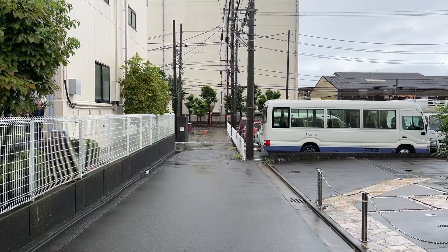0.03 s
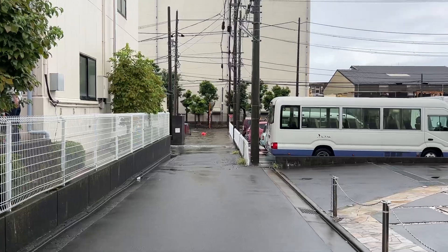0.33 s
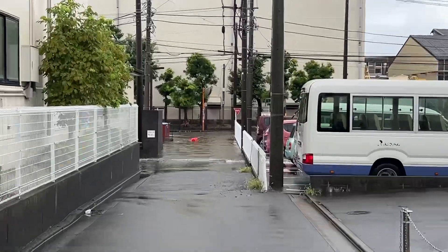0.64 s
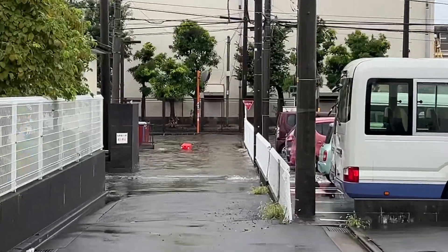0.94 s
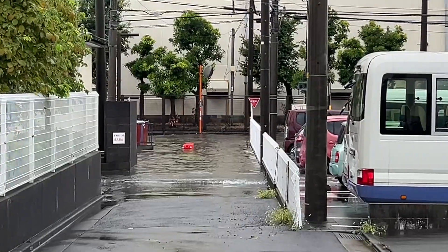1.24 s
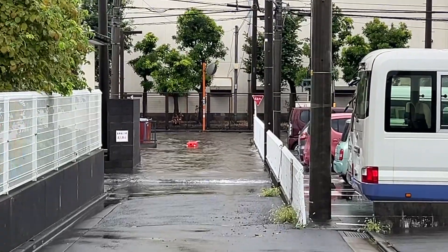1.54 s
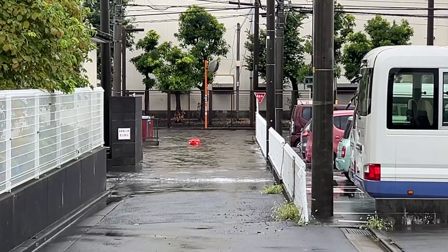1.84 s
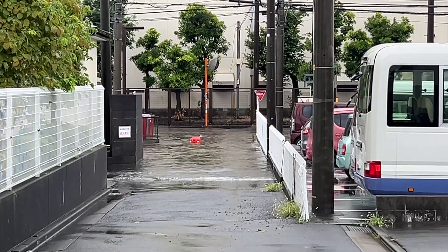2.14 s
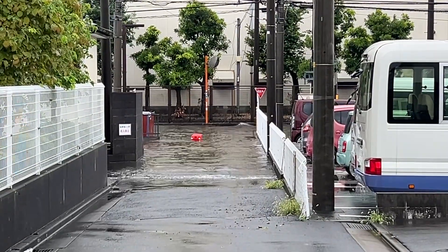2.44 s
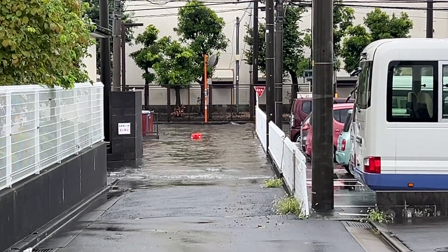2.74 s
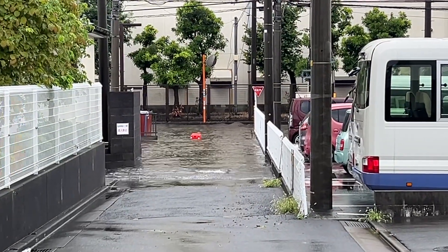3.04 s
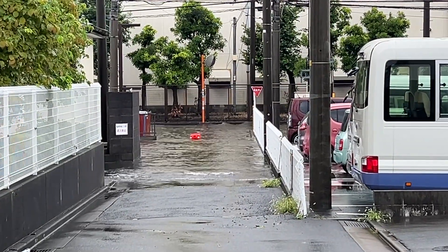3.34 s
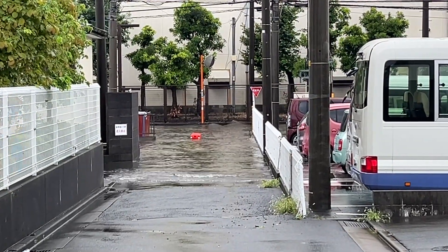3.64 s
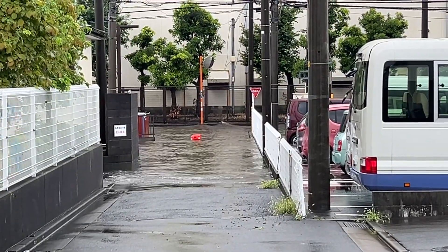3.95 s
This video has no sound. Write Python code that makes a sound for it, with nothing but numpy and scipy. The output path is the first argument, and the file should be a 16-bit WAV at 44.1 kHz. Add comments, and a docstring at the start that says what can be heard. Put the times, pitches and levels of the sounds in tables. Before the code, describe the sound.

Shallow water laps and trickles over a flooded lane, with hiss, tiny bubbles, stray drips and small splashes. A thin motor whine holds throughout above a distant town rumble. Early on, the stereo hiss narrows and the whine comes forward.

```python
"""A flooded lane between buildings, just after heavy rain, on a stereo microphone. Shallow water laps
and trickles over the asphalt with hiss, ringing bubbles, spray, stray drips and small splashes.
A motor, perhaps a pump, whines steadily; farther off the town rumbles and air and water rush between
the walls. Early on the microphone zooms in: the water's hiss narrows and the whine comes forward."""
import sys
import numpy as np
from scipy import signal
from scipy.fft import rfft, irfft
from scipy.io import wavfile

SR = 44100
rng = np.random.default_rng(int(sys.argv[2]) if len(sys.argv) > 2 else 0)


def log_audio(samples):
    """Write samples as a 16-bit WAV file to the path given in sys.argv[1]."""
    # one column per channel
    frames = np.atleast_2d(samples).T
    # limit to full scale, then quantise
    limited = np.clip(frames, -1, 1)
    pcm = np.round(limited * 32767).astype(np.int16)
    wavfile.write(sys.argv[1], SR, pcm)


N = 176400
TIME = np.arange(N) / SR
FREQS = np.maximum(np.fft.rfftfreq(N, 1 / SR), 1)

# hiss of the running water (frequency [Hz], density [dB/Hz])
HISS_SPECTRUM = [(900, -104), (2200, -92), (3200, -94.5), (4300, -93), (5100, -96), (6000, -98.3),
                 (8200, -100.3), (10500, -106), (13000, -109.5), (15500, -110)]
# rise and fall of the lapping (time [s], gain [dB])
LAPPING_SWELL = [(0, -1), (.4, -2), (.52, -0.5), (.74, -0.7), (.85, -1.8), (1.15, -0.7), (1.4, -0.5),
                 (1.72, 0), (2.2, -1.5), (2.54, -0.7), (2.7, -0.5), (3.1, -1), (3.4, -1.5), (4, -2)]
# colour of fine droplets (frequency [Hz], relative level [dB])
SPRAY_SPECTRUM = [(1000, -25), (2500, -12), (4800, 3), (6200, -4.5), (7800, 1), (10000, -0.5), (13000, -6),
                  (15500, -5)]
# small splashes (time [s], level [dB], t60 [s], ping pitch [Hz], ping over slap [dB])
SPLASH_EVENTS = [(0.353, -60, .05, 7500, -1), (0.387, -60, .04, 7000, 2), (1.233, -64, .06, 7000, -10),
                 (1.653, -54.5, .1, 6800, 1), (2.44, -63, .03, 7300, 2), (2.996, -61, .06, 7000, -10),
                 (3.5023, -52.5, .055, 8100, 1)]
# wavelets breaking on the asphalt (time [s], length [s], level [dB])
WAVELET_EVENTS = [(0.7, 0.07, -65), (1.27, .12, -66), (1.68, 0.08, -59), (2.44, 0.21, -60.5)]
# single drips (time [s], pitch [Hz], level [dB], t60 [s])
DRIP_EVENTS = [(.499, 4750, -52.5, 0.14), (.715, 4600, -56, .15), (.96, 13000, -63, .035),
               (1.32, 4900, -57, .15), (1.654, 3960, -53.5, 0.1), (1.871, 13200, -58.5, .018),
               (2.015, 2900, -51, 0.013), (2.248, 12600, -59, .015), (2.283, 4330, -52.5, 0.057),
               (2.635, 2600, -45, 0.03), (3.186, 2500, -48, .03), (3.826, 2600, -49, 0.035)]
# the motor's whine at the microphone (time [s], left level [dB], right level [dB])
WHINE_LEVELS = [(0, -52, -54), (.25, -50, -69), (.34, -49, -52), (.41, -53, -55), (.46, -48, -45),
                (.72, -51, -46.5), (1.1, -50.5, -46.5), (1.38, -51, -47), (1.5, -47, -44), (1.62, -54, -50),
                (1.69, -50, -46), (2.25, -48.5, -45), (2.6, -51, -46.5), (3.2, -49.5, -46),
                (3.38, -51, -47.8), (3.55, -50, -46), (4, -49.5, -45.5)]
# the motor's weaker tones (pitch [Hz], level [dB])
HUM_TONES = [(399.5, -56), (548, -68), (1210, -72), (1459, -68), (2285, -74), (2675, -71), (7720, -85.5),
             (11612, -83), (11817, -91.5), (12026, -90), (15130, -92)]
# distant traffic and machinery (frequency [Hz], density [dB/Hz])
RUMBLE_SPECTRUM = [(18, -92), (30, -81), (42, -66.5), (57, -59.5), (80, -62), (100, -65.5), (122, -61),
                   (200, -71.5), (400, -86), (1000, -105), (3000, -150)]
# swell of the rumble (time [s], gain [dB])
RUMBLE_GAIN = [(0, -2.5), (.3, -1.5), (.6, -1.5), (.8, 1), (1.2, -1), (1.5, -1), (1.7, 0.5), (2.1, -0.6),
               (2.25, 0.5), (2.4, -2.5), (2.6, -2.5), (3.1, 0.5), (3.4, -3), (3.58, -2), (4, -0.5)]
# low throbs in the rumble (time [s], length [s], pitch [Hz], level [dB])
THROB_EVENTS = [(0.018, 0.073, 66, -44), (0.108, 0.077, 72, -43), (1.24, .09, 68, -43.5),
                (1.538, .13, 119, -43.5), (1.58, 0.21, 56.7, -45.5), (1.84, 0.13, 58, -42.5),
                (2.31, 0.14, 58.3, -44.5), (3.259, 0.11, 66.4, -42), (3.43, 0.085, 112, -41.5),
                (3.717, 0.11, 62, -44.5)]
# far rush of air and water between the walls (frequency [Hz], density [dB/Hz])
RUSH_SPECTRUM = [(100, -80.5), (280, -71.5), (450, -75.5), (720, -77), (1030, -81), (1500, -78.5),
                 (1850, -81), (2300, -90.5), (3000, -95.5), (6000, -112), (15000, -135)]
# swell of the rush (time [s], gain [dB])
RUSH_GAIN = [(0, 0.8), (.45, 1.06), (.95, -0.2), (1.3, 0.3), (1.7, 0.8), (2.0, 0), (2.5, 0.9), (2.95, 0),
             (3.1, 0.8), (3.4, 0.5), (3.65, -1.1), (4, -0.5)]
# lean of the far sounds (frequency [Hz], left minus right [dB])
FAR_BALANCE = [(60, 0.5), (130, 0), (280, 1.5), (520, 1.4), (750, 1), (1050, -1.0), (1450, -3), (1900, -2),
               (3000, -0.5)]
# likeness of left and right in diffuse noise (frequency [Hz], correlation [-1 to 1])
STEREO_LIKENESS = [(50, 0.97), (160, 0.89), (280, 0.86), (480, 0.33), (720, 0.4), (900, 0.15),
                   (1250, -0.011), (1520, -0.46), (1850, 0.62), (2500, 0.88), (3600, 1), (4600, 1),
                   (5600, 0.85), (9000, 1), (15000, 1)]
# lag of the microphone's left port behind the right (frequency [Hz], lag [cycles])
LEFT_PORT_LAG = [(0, -.033), (250, -.025), (400, .02), (560, -.06), (900, 0), (1800, 0), (2400, -.04),
                 (3700, 0), (5000, 0), (5650, .11), (6400, 0), (7400, 0), (9900, .5), (11000, .62),
                 (12200, .94), (13600, 1.05), (15400, 1.47)]

BUBBLES_PER_S, BUBBLE_DB, BUBBLE_T60_CYCLES = 900, -60.5, 42
BUBBLE_LOW_HZ, BUBBLE_HIGH_HZ, BUBBLE_TILT_DB_PER_OCTAVE = 2120, 5610, -5.5
SPRAY_PER_S, SPRAY_DB = 240, -85
SPLASH_RISE_S, PING_T60_S, SCATTER_DB, SCATTER_T60_S = 0.00091, 0.049, -7, 0.25
ZOOM_START_S, ZOOM_END_S = 0.21, 0.48
SILENCE_S, CUTOFF_HZ = .035, 15600


def water():
    """Shallow water runs over the asphalt: hiss, spray and bubbles all follow the lapping."""
    flow = from_db(in_time(LAPPING_SWELL)[0])
    hiss = diffuse_noise(HISS_SPECTRUM, flicker_db=1.27, flicker_rate=18, early_likeness=0.59)
    droplets = random_clicks(SPRAY_PER_S * flow, spread_db=3)
    spray = from_db(SPRAY_DB) * unit_rms(spray_colour(droplets))
    return flow * (hiss + spray + bubbles(flow))


def bubbles(flow, sizes=48):
    """Tiny bubbles ring briefly, each size at its own pitch, more of them as the water laps."""
    clicks = random_clicks(BUBBLES_PER_S * flow, spread_db=2.4)
    size, out = rng.integers(0, sizes, N), 0
    for k, hz in enumerate(np.geomspace(BUBBLE_LOW_HZ, BUBBLE_HIGH_HZ, sizes)):
        tilt_db = BUBBLE_TILT_DB_PER_OCTAVE * np.log2(hz / BUBBLE_LOW_HZ)
        pan_db = rng.normal(0, 1) * np.array([[1], [-1]])
        out += from_db(tilt_db + pan_db) * ring(clicks * (size == k), hz, BUBBLE_T60_CYCLES / hz)
    return from_db(BUBBLE_DB) * unit_rms(out)


def splashes():
    """Sharp slaps on wet ground, each with a ping and scattering droplets, and the fizz of wavelets."""
    power, pings, white = np.zeros(N), np.zeros(N), rfft(rng.standard_normal(N))
    for start, db, t60, hz, ping_db in SPLASH_EVENTS:
        age = np.maximum(TIME - start, 0)
        attack = from_db(db) * np.minimum(age / SPLASH_RISE_S, 1)
        scatter = from_db(SCATTER_DB) * decay(age, SCATTER_T60_S)
        power += (attack * (decay(age, t60) + scatter)) ** 2
        pings += attack * from_db(ping_db) * decay(age, PING_T60_S) * narrow_noise(white, hz, width=.12)
    for start, length, db in WAVELET_EVENTS:
        power += (from_db(db) * hump(start, length)) ** 2
    return spray_colour(np.sqrt(power) * rng.standard_normal(N)) + pings


def drips():
    """Stray drips, centre of the image: each plip is a narrow band of noise that dies quickly."""
    out, white = np.zeros(N), rfft(rng.standard_normal(N))
    for start, hz, db, t60 in DRIP_EVENTS:
        envelope = (TIME > start) * decay(np.maximum(TIME - start, 0), t60)
        out += from_db(db) * envelope * narrow_noise(white, hz, width=.12)
    return out


def motor():
    """One strong whine among weaker steady tones; after the zoom it sits right of centre."""
    whine = from_db(in_time(WHINE_LEVELS)) * motor_tone(hz=1701.8, wander_hz=0.6, flutter_db=0.6)
    hum = sum(from_db(db) * motor_tone(hz, wander_hz=1.5, flutter_db=1.2) for hz, db in HUM_TONES)
    return whine + hum


def motor_tone(hz, wander_hz, flutter_db):
    """A tone of rms near 1 that wanders a little and flutters on its way to each microphone port."""
    phase = 2 * np.pi * np.cumsum(hz + wander_hz * drift(7.36)) / SR
    flutter = (drift(12.0) + np.array([drift(27), drift(27)])) / np.sqrt(2)
    return np.sqrt(2) * np.sin(phase) * from_db(flutter_db * flutter)


def town():
    """Distant traffic and machinery swell under a far rush; each register leans a little to one side."""
    rumble = diffuse_noise(RUMBLE_SPECTRUM, flicker_db=1.0, flicker_rate=10.3)
    rush = diffuse_noise(RUSH_SPECTRUM, flicker_db=1.23, flicker_rate=15.7)
    far = from_db(in_time(RUMBLE_GAIN)) * rumble + from_db(in_time(RUSH_GAIN)) * rush
    lean = from_db(per_bin(FAR_BALANCE) * np.array([[.5], [-.5]]))
    return irfft(rfft(far) * lean, N)


def throbs():
    """Now and then the distant rumble throbs: a short, rounded swell in one low register."""
    out, white = np.zeros(N), rfft(rng.standard_normal(N))
    for start, length, hz, db in THROB_EVENTS:
        throb = hump(start, length) * narrow_noise(white, hz, width=.28)
        out += from_db(db) * unit_rms(throb) * np.sqrt(length * SR / N)  # rms over its own length
    return out


def diffuse_noise(spectrum, flicker_db, flicker_rate, early_likeness=1, bands=18):
    """Stereo noise whose bands flicker, partly together; early_likeness < 1 widens it before the zoom."""
    colour = from_db(per_bin(spectrum)) * np.sqrt(SR / 2)
    likeness = np.clip(per_bin(STEREO_LIKENESS), -1, 1)
    noise = rfft(rng.standard_normal((2, N))) * colour * np.sqrt([1 + likeness, 1 - likeness])
    band_position = np.interp(np.log(FREQS), np.log([30, 15000]), [0, bands - 1])
    together, mid_side = drift(flicker_rate), 0
    for k in range(bands):
        band = irfft(noise * np.maximum(1 - abs(band_position - k), 0), N)
        mid_side += band * from_db(flicker_db * (drift(flicker_rate) + .5 * together))
    mid, side = mid_side / np.sqrt(2)
    focus = np.interp(TIME, [ZOOM_START_S, ZOOM_END_S], [early_likeness, 1])
    wide = irfft(rfft(rng.standard_normal((2, N))) * colour, N)
    return np.sqrt(focus) * np.array([mid + side, mid - side]) + np.sqrt(1 - focus) * wide


def narrow_noise(white, hz, width):
    """A band of rms 1 out of a white spectrum; the width is a share of the pitch."""
    return unit_rms(irfft(white / (1 + ((FREQS / hz - 1) / width) ** 4), N))


def spray_colour(x):
    """The bright colour of fine droplets; white noise keeps its power."""
    return irfft(rfft(x) * unit_rms(from_db(per_bin(SPRAY_SPECTRUM))), N)


def random_clicks(per_s, spread_db):
    """Clicks at random moments, many small and a few large."""
    heights = from_db(spread_db * np.minimum(rng.exponential(1, N), 5)) * rng.choice([-1, 1], N)
    return heights * (rng.random(N) < per_s / SR)


def ring(clicks, hz, t60):
    """A unit click sets a sine of height 1 ringing."""
    radius, angle = decay(1 / SR, t60), 2 * np.pi * hz / SR
    poles = [1, -2 * radius * np.cos(angle), radius ** 2]
    return signal.lfilter([0, np.sin(angle)], poles, clicks + 1e-18)


def drift(rate, step=40, settle=2000):
    """A slow random wander of rms about 1, mostly below the rate in Hz."""
    pole = np.exp(-2 * np.pi * step * rate / SR)
    white = rng.standard_normal(N // step + settle + 2)
    slow = signal.lfilter([1], [1, -2 * pole, pole ** 2], white)[settle:]
    return np.interp(np.arange(N) / step, np.arange(len(slow)), unit_rms(slow))


def decay(age, t60):
    """A decay that loses 60 dB in t60."""
    return np.exp(-np.log(1000) * age / t60)


def hump(start, length):
    """A rounded rise and fall."""
    return np.sin(np.pi * np.clip((TIME - start) / length, 0, 1))


def in_time(rows):
    """The columns of a curve at every sample."""
    times, *columns = np.transpose(rows)
    return np.array([np.interp(TIME, times, column) for column in columns])


def per_bin(points):
    """A table over log frequency, read at every frequency."""
    hz, value = np.transpose(points)
    return np.interp(np.log(FREQS), np.log(hz), value)


def from_db(db):
    """Decibels to gain."""
    return 10 ** (np.asarray(db) / 20)


def unit_rms(x):
    """Scale to unit rms."""
    return x / np.sqrt(np.mean(x ** 2) + 1e-20)


def scene():
    """The lane from where the microphone stands."""
    return town() + throbs() + motor() + water() + splashes() + drips()


def record(dry):
    """One microphone port lags the other. The sound begins after a brief silence; the top is cut."""
    lag_cycles = np.interp(FREQS, *np.transpose(LEFT_PORT_LAG))
    ports = irfft(rfft(dry) * np.exp(-1j * np.pi * lag_cycles * np.array([[1], [-1]])), N)
    fade_in = np.clip((TIME - SILENCE_S) / .001, 0, 1)
    lowpass = signal.ellip(12, .1, 80, CUTOFF_HZ, fs=SR, output="sos")
    return signal.sosfilt(lowpass, ports * fade_in)


dry = scene()
out = record(dry)
log_audio(out)
```